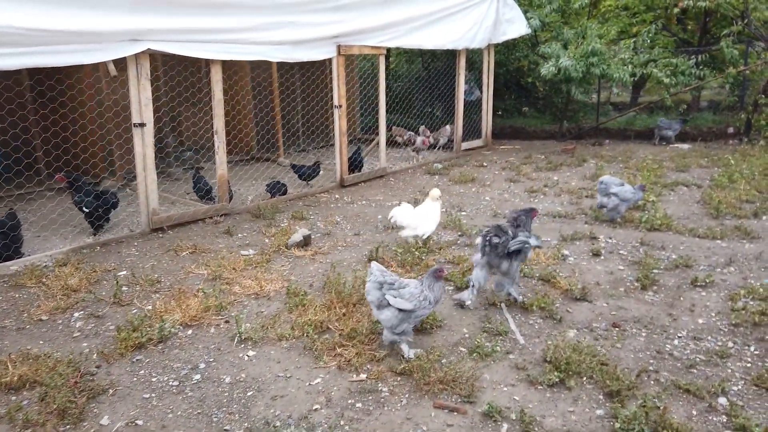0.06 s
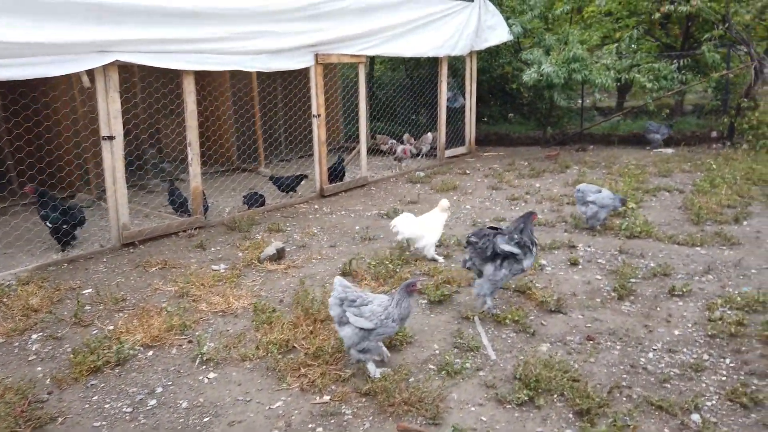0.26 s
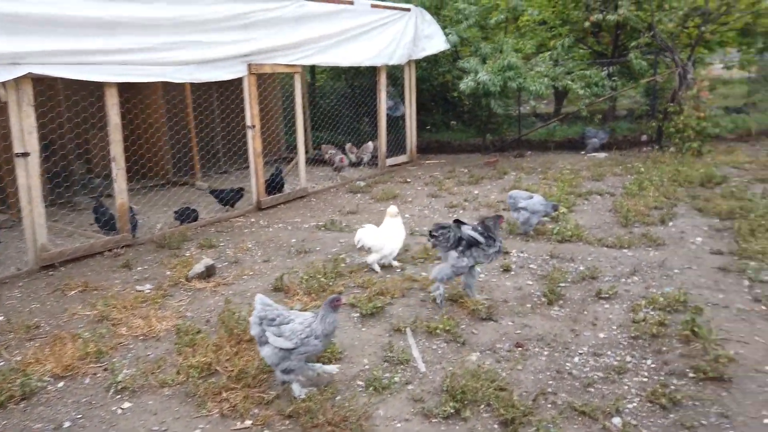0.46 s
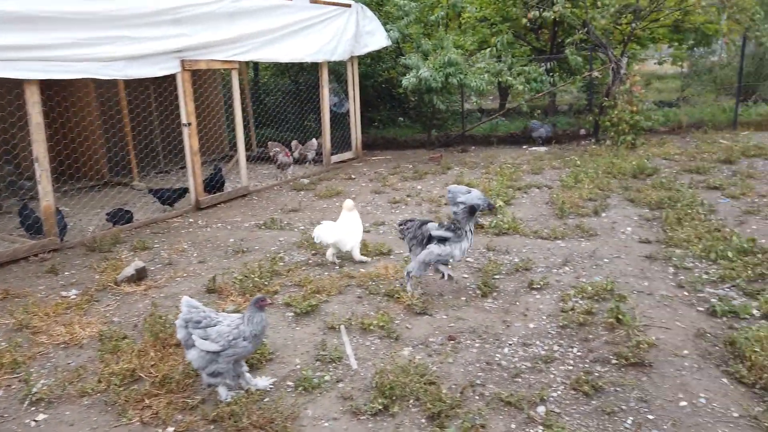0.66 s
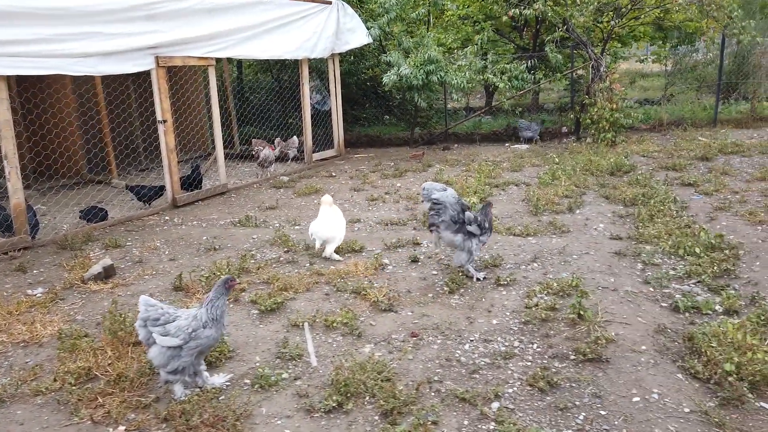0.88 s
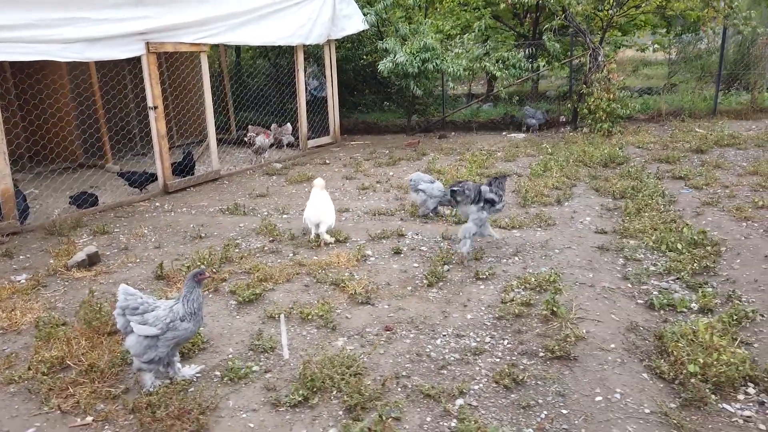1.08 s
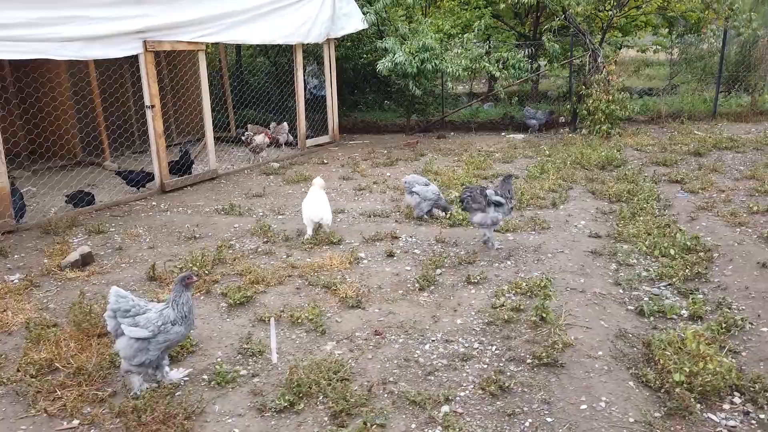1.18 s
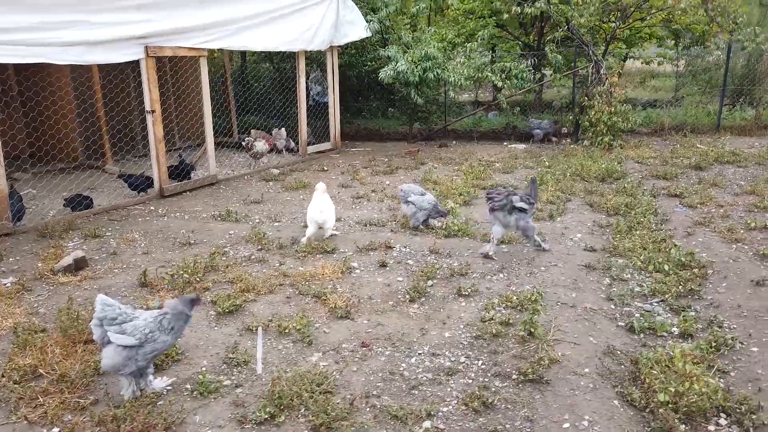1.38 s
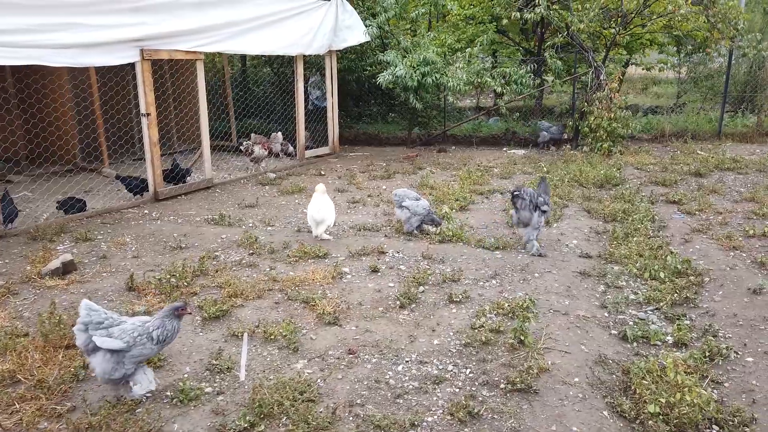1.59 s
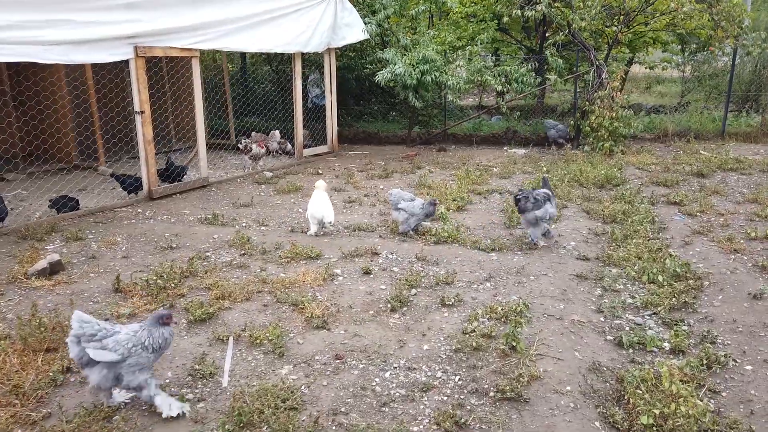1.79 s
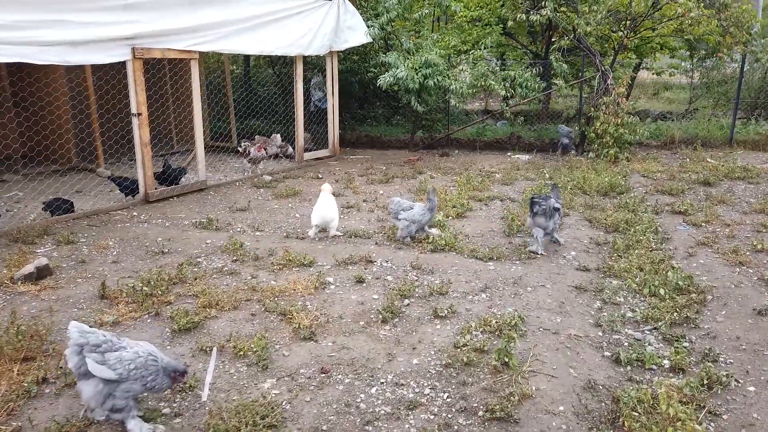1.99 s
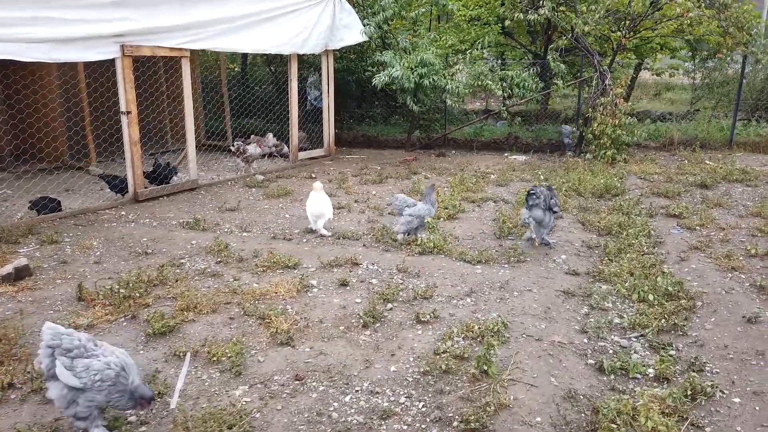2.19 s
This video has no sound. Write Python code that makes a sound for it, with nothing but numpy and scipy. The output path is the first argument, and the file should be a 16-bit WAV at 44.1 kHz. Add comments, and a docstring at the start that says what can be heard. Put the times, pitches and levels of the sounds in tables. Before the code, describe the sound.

A rooster crows once, fairly close: a short note, then a long held call that cracks, turns hoarse and ends a step higher. Faint thin bird peeps before and after, soft outdoor rustle, stereo microphone.

```python
"""Rooster crow in a yard

A rooster crows once: a short first note, then a long call that breaks between registers, turns hoarse,
splits into half-pitch lines and ends a step higher. Each register is a bank of jittering sines; short sine
flares and grainy noise join it. A small bird's gliding whistles peep twice before the crow and once after.
Shaped noise and two hum lines lie under it; decaying noise tails make the coop's answer to the birds.
"""
import sys
import numpy as np
from scipy import signal
from scipy.fft import rfft, irfft, next_fast_len
from scipy.io import wavfile
from scipy.ndimage import uniform_filter1d, map_coordinates

SR = 44100
rng = np.random.default_rng(int(sys.argv[2]) if len(sys.argv) > 2 else 0)


def unload_wav(signal):
    """Save mono or channel-first audio to the path in sys.argv[1] as 16-bit WAV at rate SR, clipped to [-1, 1]."""
    wavfile.write(
        sys.argv[1],
        SR,
        np.round(np.clip(np.atleast_2d(signal).T, -1, 1) * 32767).astype(np.int16),
    )


N = 99225
T = np.arange(N) / SR

# stereo width of the birds: (frequency [Hz], side over mid [dB])
STEREO_WIDTH = [(400, -24), (1300, -17), (2400, -4.5), (4400, 6.5), (8000, -1.5), (15000, 2.5)]


def amp(db):
    """Decibels to linear amplitude."""
    return 10 ** (np.asarray(db) / 20)


def unit(x):
    """Scale to an RMS of one."""
    return x / np.sqrt(np.mean(x ** 2) + 1e-20)


def along(points, hz):
    """Read (Hz, value) points on a log frequency axis."""
    f, v = np.transpose(points)
    return np.interp(np.log(hz + 1), np.log(f + 1), v)


def curves(rows, t=T):
    """One value per sample for each column after the time."""
    s, *cols = np.transpose(rows)
    return [np.interp(t, s, c) for c in cols]


def wobble(rate, size=N):
    """A smooth random curve with `rate` knots a second."""
    knots = rng.standard_normal(int(size * rate / SR) + 4)
    return map_coordinates(knots, [np.arange(size) * rate / SR])


def filtered(x, response):
    """Multiply the spectrum of x by a complex response of frequency."""
    m = next_fast_len(N + SR // 2)
    return irfft(rfft(x, m) * response(np.fft.rfftfreq(m, 1 / SR)), m)[..., :N]


def hum():
    """Two low sines whose pitch and level waver."""
    # hum lines: (frequency [Hz], mean level [dB])
    hum_lines = [(92, -55), (285, -56)]
    out = np.zeros(N)
    for hz, db in hum_lines:
        level = amp(db + 2.5 * wobble(6))
        out += level * np.sin(2 * np.pi * np.cumsum(hz * (1 + .01 * wobble(10))) / SR)
    return out


def yard():
    """Far rustle and rumble: noise patchy in time and frequency, near mono in the bass, plus the hum."""
    # noise colour: (frequency [Hz], relative density [dB])
    colour = [(20, 7.5), (270, -2.5), (750, -5.5), (1900, -1.5), (3350, -21), (7000, -34), (15500, -33)]
    # overall noise level: (time [s], level [dB])
    noise_level = [(0, -45), (2, -50.5), (2.25, -51)]
    # left-right likeness: (frequency [Hz], correlation [-1 to 1])
    likeness = [(60, 0.99), (1000, 1), (15000, 0.41)]
    z = signal.stft(rng.standard_normal((2, N)), nperseg=512)[2]
    patches = uniform_filter1d(rng.standard_normal(z.shape[1:]), 6, 0)
    patches = uniform_filter1d(patches, 14, 1)
    pair = signal.istft(z * amp(1.8 * unit(patches)), nperseg=512)[1][:, :N]

    def mid_side_shape(hz):
        turn = np.arccos(np.clip(along(likeness, hz), -1, 1)) / 2
        return amp(along(colour, hz)) * [np.cos(turn), np.sin(turn)]

    mid, side = filtered(pair, mid_side_shape)
    return amp(curves(noise_level)[0]) * unit(np.array([mid + side, mid - side])) + hum()


def peeps():
    """Thin falling whistles of a small bird: sines gliding down under rounded swells."""
    # peeps: (start [s], length [s], start pitch [Hz], end pitch [Hz], peak level [dB])
    whistles = [(.025, .07, 8000, 7800, -54), (.143, .035, 7850, 7800, -68), (2.158, .062, 8020, 7860, -61)]
    out = np.zeros(N)
    for s, length, hz0, hz1, db in whistles:
        u = np.clip((T - s) / length, 0, 1)
        swell = np.abs(np.sin(np.pi * u ** 1.3)) ** .7
        out += amp(db) * swell * np.sin(2 * np.pi * np.cumsum(hz0 + (hz1 - hz0) * u) / SR)
    return out


def coop(x):
    """The coop's answer: a stereo noise tail, narrow in the bass, where each frequency dies at its own speed."""
    # decay: (frequency [Hz], time to fall 60 dB [s])
    decay = [(300, 0.3), (4000, 0.34), (10000, 0.038)]
    # tail colour: (frequency [Hz], level against the direct sound [dB])
    answer_level = [(700, -17), (1500, -14), (3000, -7), (10000, -6)]
    hz, t, z = signal.stft(rng.standard_normal((2, SR // 2)), SR, nperseg=256)
    z[1] *= amp(along(STEREO_WIDTH, hz) - 2.5)[:, None]  # side
    mid, side = signal.istft(z * amp(-60 * t / along(decay, hz)[:, None]), SR, nperseg=256)[1]
    tail = np.array([mid + side, mid - side]) / np.linalg.norm(mid)
    sent = filtered(x, lambda f: amp(along(answer_level, f)))
    late = np.pad(sent, (600, 0))  # delay in samples
    return signal.fftconvolve(late[None], tail, axes=1)[:, :N]


def register(rows, tilt_db):
    """One voice register: harmonics of a jittering pitch and lines halfway between; gives low part, treble, gate."""
    # upper low harmonics before fading: (time [s], 3rd harmonic [dB], 4th harmonic [dB])
    overtones = [(.23, -42, -73), (.26, -36, -50), (.37, -46, -56), (.54, -47.5, -68), (.68, -49.5, -62.5),
                 (.7, -31, -84), (.76, -43.5, -61), (.8, -69, -61), (1.1, -44.5, -62.5), (1.26, -64, -57),
                 (1.4, -51.5, -45.5), (1.58, -51.5, -49.5), (1.62, -74, -62.5), (1.8, -60.5, -62.5)]
    # hoarseness: (time [s], roughness [0-1])
    hoarseness = [(.22, .4), (.36, .33), (.39, .8), (.5, .5), (.6, .26), (.67, .25), (.76, .5), (.85, .6),
                  (1.0, .36), (1.22, .03), (1.52, .03), (1.59, .15), (1.65, .07), (1.79, .08), (1.82, .3)]
    # lines at odd multiples of half the pitch: (time [s], level [dB])
    half_level = [(.8, -66.5), (.87, -37), (1.08, -45.5), (1.2, -42), (1.55, -37.5), (1.6, -47.5),
                  (1.62, -86)]
    # beak colour of the upper harmonics: (frequency [Hz], relative level [dB])
    beak = [(3000, -26.5), (3740, 11), (4430, 4.5), (6450, -2.5), (7560, 2.5), (8900, -13), (10500, -7),
            (15500, -36.5)]
    # resonance of the open mouth: (time [s], centre [Hz], gain [dB])
    mouth = [(.38, 4050, 5), (.55, 5250, 9), (.85, 5050, 11), (1.25, 4450, 8), (1.5, 5700, 11),
             (1.75, 6080, 10)]
    jitter, shimmer_db, shimmer_rate = 0.0301, 6, 66.1  # pitch fraction, dB at full roughness; knots a second
    edge_s, mouth_wide_hz = 0.0023, 260
    scatter_rate = 330  # a hoarse overtone spreads into a band about this wide, Hz
    fill_db = -7.5  # a hoarse voice also fills the gaps between its overtones

    a, b = round(rows[0][0] * SR), round(rows[-1][0] * SR)
    t, size = T[a:b], b - a
    hz, h1, h2 = curves(rows, t)
    h3, h4 = curves(overtones, t)
    rough, half = curves(hoarseness, t)[0], curves(half_level, t)[0]
    fade = np.minimum(h2 + 36, 0)  # overtones die away once the 2nd harmonic sinks below -36 dB
    edge = np.clip(np.minimum(t - t[0], t[-1] - t) / edge_s, 0, 1)
    half_phase = np.pi * np.cumsum(hz * (1 + jitter * rough * wobble(145.06, size))) / SR

    def line(k, db):
        """Shimmering sine at k times half the pitch."""
        level = np.sqrt(2) * amp(db + shimmer_db * rough * wobble(shimmer_rate, size))
        return level * np.sin(k * half_phase + rng.uniform(0, 2 * np.pi))

    # even k are harmonics, odd k the half-pitch lines
    low_levels = [(2, h1), (3, half), (4, h2), (5, half + 2 - 15 * rough),
                  (6, h3 + fade), (7, half - 22), (8, h4 + fade)]
    low, top, gate = np.zeros((3, N))
    low[a:b] = edge * sum(line(k, db) for k, db in low_levels)

    share = np.clip(2.6 * rough ** 1.5, 0, .92)  # scattered part of each overtone's power
    half_treble = np.maximum(np.minimum(half + 46, 0), fill_db + 10 * np.log10(share + 1e-4))
    mouth_hz, mouth_db = curves(mouth, t)
    treble, power = 0, 0
    for k in range(9, 44):
        f = k * hz / 2
        db = along(beak, f) + tilt_db * np.log2(f / 7600)
        db = db + mouth_db * np.exp(-((f - mouth_hz) / mouth_wide_hz) ** 2)
        db = db + k % 2 * half_treble + 4 * wobble(10.5, size)
        scatter = np.sqrt(1 - share) + np.sqrt(share) * unit(wobble(scatter_rate, size))
        treble = treble + scatter * line(k, db)
        power = power + amp(2 * db)
    top[a:b] = edge * amp(fade) * treble / np.sqrt(power)
    gate[a:b] = edge
    return low, top, gate


def voice():
    """All registers in turn, their treble on one shared level curve and evened out where they overlap."""
    # the registers, each: (time [s], pitch [Hz], 1st harmonic [dB], 2nd harmonic [dB])
    first = [(.224, 608, -43.5, -33.5), (0.239, 628, -47, -13.5), (0.26, 680.3, -29.5, -16),
             (0.288, 698.3, -33, -20.5), (0.306, 696.8, -21, -14.5), (0.343, 657.3, -39, -14),
             (0.37, 666.3, -39, -20), (0.404, 653, -47, -42.5)]
    rise = [(0.495, 618, -42, -20.5), (0.515, 707, -36.5, -23), (0.551, 730.3, -24, -21),
            (0.584, 768.3, -34, -29.5), (0.623, 802, -23.5, -51.5)]
    high = [(0.564, 867.4, -17, -48), (0.589, 929.4, -22.5, -24.5), (0.668, 901.4, -19.5, -22.5),
            (0.689, 869, -26, -55), (0.729, 790, -25, -82.5)]
    breaking = [(.681, 665.6, -40.5, -19), (0.727, 668.4, -42, -22.5), (0.77, 731.5, -23.5, -21.5),
                (0.81, 728.6, -28.5, -36), (0.853, 711.7, -33, -23), (0.917, 708, -27.5, -25.5),
                (1.064, 693, -24.5, -28.5), (1.088, 703.4, -29.5, -44.5)]
    held = [(1.066, 664.7, -44, -21.5), (1.113, 667, -36.5, -18.5), (1.151, 677.7, -31, -21.5),
            (1.241, 688.7, -29, -33), (1.292, 682.6, -28.5, -18.5), (1.442, 673.1, -33.5, -24),
            (1.52, 671.3, -31, -21), (1.558, 663.7, -51, -23.5), (1.598, 680.8, -23, -31),
            (1.633, 667, -41, -32.5)]
    last = [(1.588, 750, -38, -28), (1.625, 775, -23, -29), (1.7, 759.4, -27.5, -32),
            (1.77, 751.4, -32, -20.5), (1.799, 748.8, -24, -30), (1.843, 707.7, -26.5, -38.5)]
    # treble slope of each register in that order: (slope [dB per octave])
    tilts = [1, -4, 4, 2.5, 2.6, -3.5]
    # treble of the voice before fading: (time [s], level [dB])
    treble_level = [(.22, -60.5), (.246, -46.5), (.39, -50.5), (.5, -53), (.58, -40.5), (.7, -47.5),
                    (1.58, -46), (1.66, -51), (1.72, -40.5), (1.82, -49), (1.86, -49)]
    parts = [register(*r) for r in zip((first, rise, high, breaking, held, last), tilts)]
    low, top, gate = np.sum(parts, axis=0)
    return low + amp(curves(treble_level)[0]) * top / np.sqrt(np.maximum(gate, 1))


def rasp():
    """Turbulent air in the throat: grainy band noise that follows its own level curve."""
    # air colour: (frequency [Hz], relative level [dB])
    air_colour = [(350, -68), (550, 7), (1400, 25.5), (1900, 11.5), (2600, -25)]
    # level of the grainy throat noise: (time [s], level [dB])
    air_level = [(.224, -50), (.232, -24), (.27, -31.5), (.36, -55), (.375, -21.5), (.41, -36), (.492, -71),
                 (.5, -29), (.6, -53.5), (.8, -33.5), (.95, -29.5), (1.1, -38), (1.2, -46.5), (1.59, -47),
                 (1.66, -54.5), (1.8, -47), (1.815, -33), (1.9, -44.5), (1.93, -79)]
    grains = unit(amp(5.5 * wobble(59.77)) * rng.standard_normal(N))
    air = filtered(grains, lambda f: amp(along(air_colour, f)) * (f > 300) * (f < 3000))
    return amp(curves(air_level)[0]) * unit(air)


def syrinx_flares():
    """The other side of the syrinx flares up as the call breaks: brief falling tones under bell-shaped swells."""
    # flares: (centre time [s], pitch there [Hz], peak level [dB])
    bursts = [(.793, 865, -18), (0.827, 836, -15), (0.865, 825, -18.5)]
    width_s, sag, over_db = .007, 6100, -13.5  # swell width; pitch fall, Hz a second; 2nd harmonic, dB
    out = np.zeros(N)
    for s, hz, db in bursts:
        phase = 2 * np.pi * (hz - sag * (T - s) / 2) * (T - s)
        swell = np.exp(-.5 * ((T - s) / width_s) ** 2)
        out += amp(db) * swell * (np.sin(phase) + amp(over_db) * np.sin(2 * phase))
    return out


def rooster():
    """The whole crow: voiced registers, throat air and syrinx flares added together."""
    return voice() + rasp() + syrinx_flares()


def scene():
    """The birds are widened by a side signal a quarter turn ahead; coop and yard are added."""
    sway_hz = 2500  # above this the side signal sways at random between the two polarities
    birds = rooster() + peeps()

    def widen(hz):
        return 1j * amp(along(STEREO_WIDTH, hz)) * np.array([hz < sway_hz, hz >= sway_hz])

    low, top = filtered(birds, widen)
    side = low + top * np.tanh(.4 + 4.2 * wobble(7))
    return np.array([birds - side, birds + side]) + coop(birds) + yard()


def record(dry):
    """Band limit: nothing passes at or above 15750 Hz."""
    return filtered(dry, lambda hz: hz < 15750)


dry = scene()
out = record(dry)
unload_wav(out)
```